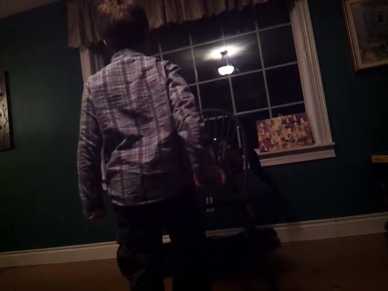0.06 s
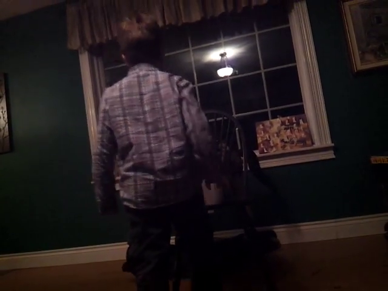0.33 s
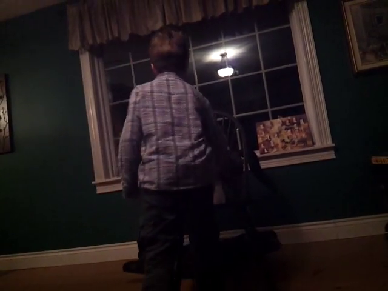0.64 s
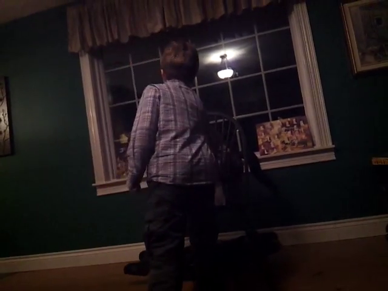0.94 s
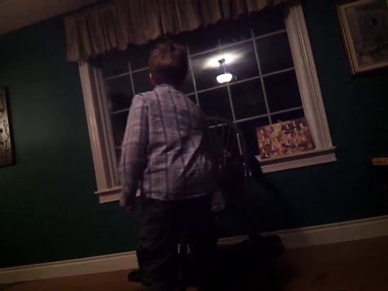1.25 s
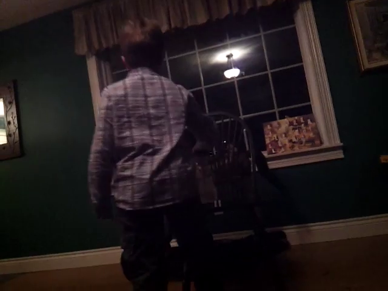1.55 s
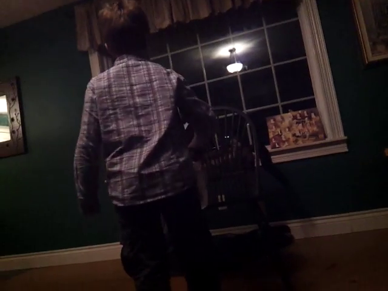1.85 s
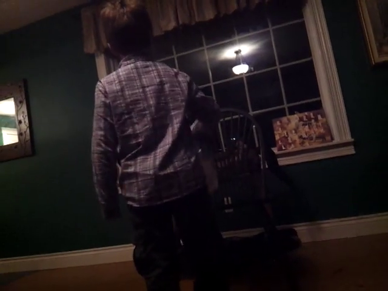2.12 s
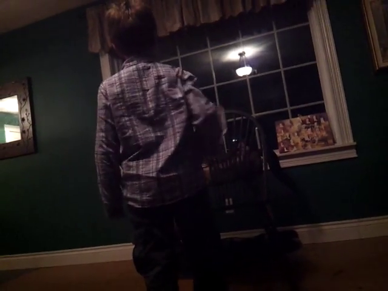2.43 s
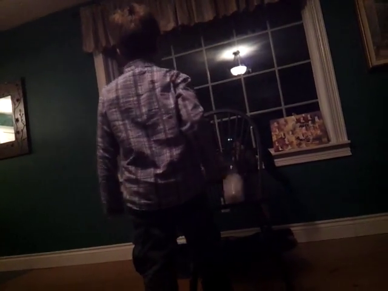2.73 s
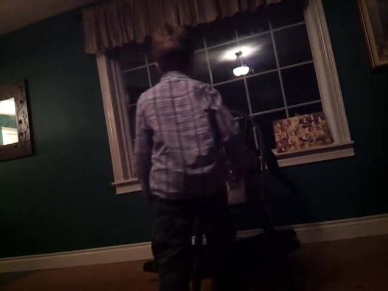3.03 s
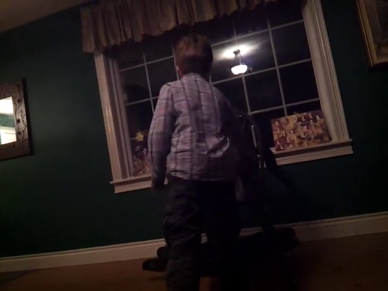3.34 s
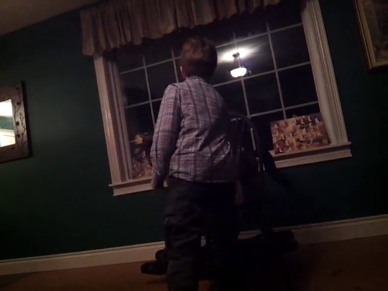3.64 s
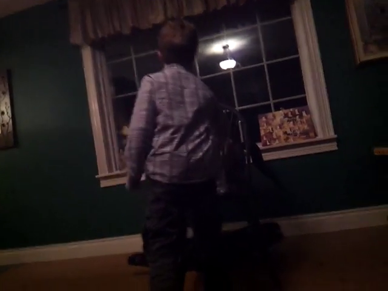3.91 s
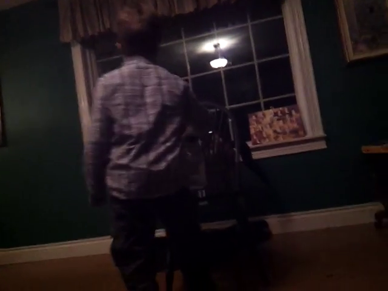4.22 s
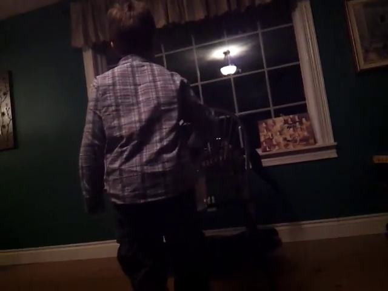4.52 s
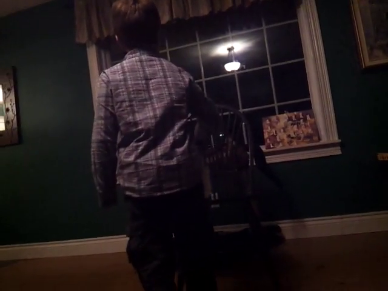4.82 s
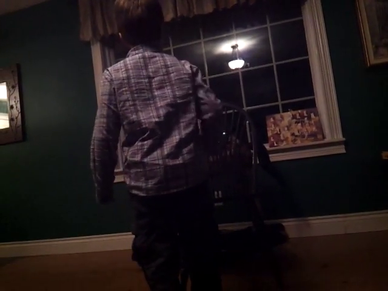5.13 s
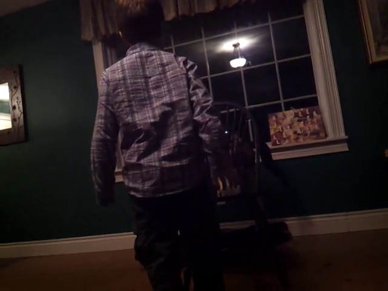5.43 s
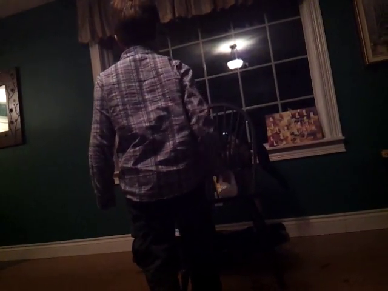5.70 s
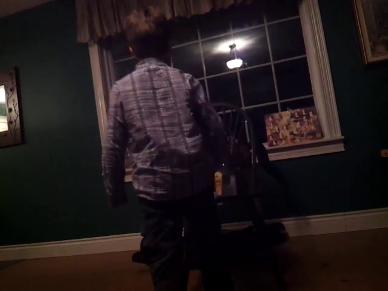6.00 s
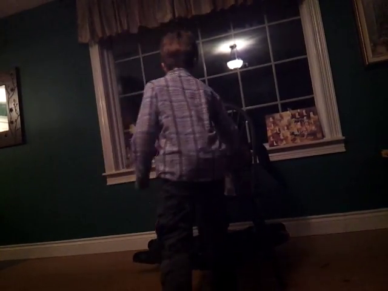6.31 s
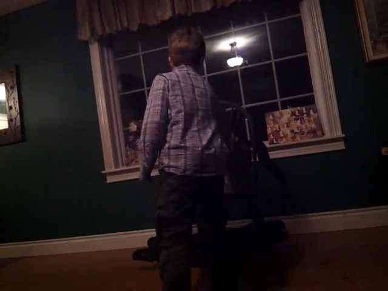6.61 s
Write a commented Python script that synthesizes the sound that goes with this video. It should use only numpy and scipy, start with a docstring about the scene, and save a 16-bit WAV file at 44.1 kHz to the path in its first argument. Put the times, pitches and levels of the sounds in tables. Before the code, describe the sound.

A plastic bottle with water in it is flipped three times, landing with a crack and thud, then knocking on a wooden floor indoors.

```python
"""Bottle flips in a bare room.

A child flips a part-filled plastic bottle three times. Each impact excites a damped response: the
shell cracks against a chair, the water slams after it, and the bottle drops, bounces and rolls on the
wooden floor. Between throws, friction sounds in clothes and soft steps, and water sloshes at its
resonance, over steady hiss, rumble and a faint mains hum."""
import sys
import numpy as np
from scipy import signal
from scipy.fft import rfft, irfft
from scipy.io import wavfile

SR = 44100
rng = np.random.default_rng(int(sys.argv[2]) if len(sys.argv) > 2 else 0)


def put_to_file(sound):
    """Save the sound as 16-bit audio at rate SR, in the file named by the first command-line argument."""
    columns = np.atleast_2d(sound).T  # one column per channel
    safe = np.clip(columns, -1, 1)
    whole_steps = np.round(safe * 32767)
    wavfile.write(sys.argv[1], SR, whole_steps.astype(np.int16))


N = 298101


def gain_of(db):
    """Amplitude ratio of a level in decibels."""
    return 10 ** (np.asarray(db) / 20)


def unit_rms(x):
    """Normalisation to an rms of 1."""
    return x / np.sqrt(np.mean(x ** 2) + 1e-20)


def unit_energy(x):
    """Normalisation to an energy of 1."""
    return x / np.linalg.norm(x)


def value_at(curve, hz):
    """Interpolation on a logarithmic frequency axis."""
    curve_hz, values = np.transpose(curve)
    return np.interp(np.log(hz + 1), np.log(curve_hz + 1), values)


def add(mix, start_s, sound):
    """Superposition of a sound on the mix."""
    part = mix[max(round(start_s * SR), 0):][:len(sound)]
    part += sound[:len(part)]


def coloured(x, spectrum):
    """Spectral shaping by a gain curve, returned at an rms of 1."""
    gains = gain_of(value_at(spectrum, np.fft.rfftfreq(len(x), 1 / SR)))
    return unit_rms(irfft(rfft(x) * gains, len(x)))


def resonate(x, hz, width_hz):
    """Resonance: two like band-pass stages in cascade, each of the given width."""
    carrier = np.exp(2j * np.pi * hz * np.arange(len(x)) / SR)
    pole = np.exp(-np.pi * width_hz / SR)
    for _ in range(2):
        x = 2 * (carrier * signal.lfilter([1 - pole], [1, -pole], x / carrier)).real
    return x


def stroke(start_s, rise_s, peak_db, fade_db_per_s):
    """Envelope of one movement: a smooth rise, then exponential decay."""
    age = np.arange(N) / SR - start_s
    swell = np.sin(np.pi / 2 * np.clip(age / rise_s, 0, 1)) ** 2
    return swell * gain_of(peak_db - fade_db_per_s * np.maximum(age - rise_s, 0))


# Background noise. Each row: frequency in Hz, relative spectral density in dB.
AIR_SPECTRUM = [(18, -26), (30, -34), (58, -1), (113, 0), (160, -9), (302, -2.5), (1300, -13.5),
                (3200, -20.5), (5880, -21), (8990, -28), (17000, -30.5)]
# Mains hum. Each row: frequency in Hz, rms level in dB.
HUM_PARTIALS = [(60, -81), (119.5, -60.5), (179, -67.5)]

def room_tone(air_db=-52):
    """Stationary background: a continuous spectrum of hiss and rumble under the lines of mains hum."""
    t = np.arange(N) / SR
    hum = sum(gain_of(db) * np.sqrt(2) * np.sin(2 * np.pi * (hz * t + rng.random()))
              for hz, db in HUM_PARTIALS)
    return gain_of(air_db) * coloured(rng.standard_normal(N), AIR_SPECTRUM) + hum


# Decay of the room. Each row: frequency in Hz, time to fall 60 dB in seconds.
REVERB_TIMES = [(60, 0.2), (250, 0.6), (700, 0.64), (1500, 0.64), (3000, 0.59), (6000, 0.55), (9000, 0.34),
                (14000, 0.052)]

def room(direct_db, early_db, early_t60, echoes_per_s=5000, build_s=0.0057):
    """Impulse response: direct sound, a cluster of chatter and near reflections, and a diffuse tail."""
    t = np.arange(SR) / SR
    near, far = rng.standard_normal((2, SR))
    echoes = near * (rng.random(SR) < echoes_per_s / SR)
    early = unit_energy(echoes * gain_of(-60 * t / early_t60))
    hz, frame_s, bands = signal.stft(far, SR, nperseg=256)
    decay = gain_of(-60 * frame_s / value_at(REVERB_TIMES, hz)[:, None])
    tail = signal.istft(bands * decay, SR, nperseg=256)[1][:SR]
    response = unit_energy(tail * (1 - np.exp(-t / build_s))) + gain_of(early_db) * early
    response[0] += gain_of(direct_db)
    return response


def friction(strokes, spectrum, fade_db_per_s, slips_per_s, spread_db, wet_db):
    """Stick-slip friction: tiny uneven slips, smeared by the room, swell with each movement."""
    slips = rng.standard_normal(N) * (rng.random(N) < slips_per_s / SR)
    slips *= gain_of(spread_db * np.minimum(rng.exponential(1, N), 4))
    response = unit_energy(room(direct_db=-25, early_db=-3.5, early_t60=0.11))
    smear = signal.fftconvolve(slips, response)[:N]
    effort = np.sqrt(sum(stroke(*row, fade_db_per_s) ** 2 for row in strokes))
    return coloured(slips + gain_of(wet_db) * smear, spectrum) * effort


# Movements of the clothes. Each row: start in seconds, rise in seconds, peak in dB.
RUSTLES = [(-.02, 0.018, -41.5), (.44, 0.042, -52.5), (.73, .03, -52.5), (1.08, 0.26, -52),
           (1.42, 0.19, -52), (1.61, 0.16, -42.5), (1.85, .03, -45.5), (1.98, 0.24, -48),
           (2.33, 0.042, -50.5), (2.48, 0.03, -41.5), (2.52, 0.059, -48), (3.07, 0.02, -52.5),
           (3.5, 0.061, -51), (3.71, 0.038, -50.5), (4.17, 0.032, -52.5), (4.5, 0.36, -55),
           (4.84, 0.13, -47.5), (5.21, 0.013, -46.5), (5.75, 0.092, -49), (5.89, 0.02, -42.5),
           (6.1, 0.044, -52.5), (6.22, 0.24, -47.5), (6.53, 0.056, -46.5)]
# Sliding cloth. Each row: frequency in Hz, relative spectral density in dB.
CLOTH_SPECTRUM = [(700, -9), (1500, -2.5), (3000, -6.5), (4500, -4.5), (6500, -4), (8000, -10),
                  (10000, -18), (13000, -18.5), (16500, -20.5)]

def clothes_rustle():
    """Friction of cloth on cloth radiates bright broadband noise."""
    return friction(RUSTLES, CLOTH_SPECTRUM,
                    fade_db_per_s=60.5, slips_per_s=2200, spread_db=-0.5, wet_db=1)


# Soft swishes of sleeve and feet, and one light splash of water in the bottle at 3.96 s.
# Each row: start in seconds, rise in seconds, peak in dB.
SWISHES_AND_SPLASH = [(-.02, 0.018, -32), (1.1, 0.25, -45.5), (1.52, 0.35, -44.5), (1.98, 0.068, -50.5),
                      (2.3, 0.059, -43), (2.485, .015, -37.5), (2.53, 0.028, -36.5), (3.96, 0.04, -50.5),
                      (4.55, 0.04, -51.5), (4.83, 0.14, -33), (5.21, 0.056, -39), (5.73, 0.075, -41)]
# Their shared colour. Each row: frequency in Hz, relative spectral density in dB.
SWISH_SPECTRUM = [(120, -24), (200, -2), (227, -12), (284, -3), (493, -7), (856, -2), (1060, -4.5),
                  (1750, -6.5), (4000, -23.5), (5200, -19), (8800, -120)]

def swishes_and_splash():
    """Dense random pulses merge into soft noise: sleeve and feet brush, and water splashes once."""
    return friction(SWISHES_AND_SPLASH, SWISH_SPECTRUM,
                    fade_db_per_s=79, slips_per_s=1800, spread_db=2, wet_db=10.5)


def contact_pulse(spectrum, tilt_db, spot_hz, cutoff_hz, spot_db, spot_q, size=8192):
    """Minimum-phase pulse: the struck spot adds a resonance, and a softer contact cuts the treble."""
    hz = np.maximum(abs(np.fft.fftfreq(size, 1 / SR)), 1)
    db = value_at(spectrum, hz) + tilt_db * np.log2(np.maximum(hz, 100) / 1000)
    db += spot_db / (1 + (spot_q * (hz / spot_hz - spot_hz / hz)) ** 2)
    db -= 10 * np.log10(1 + (hz / cutoff_hz) ** 4)
    log_gain = np.log(gain_of(np.maximum(db, db.max() - 90)))
    causal_spectrum = np.exp(signal.hilbert(log_gain).conj())
    return unit_energy(np.fft.ifft(causal_spectrum).real[:size // 2])


def ring(modes):
    """Free vibration: exponentially damped modes with random phases."""
    t = np.arange(SR) / SR
    phases = 2 * np.pi * rng.random(len(modes))
    return sum(gain_of(db - 60 * t / t60) * np.sin(2 * np.pi * hz * t + phase)
               for phase, (hz, db, t60) in zip(phases, modes))


def impacts(rows, spectrum, spot_db, spot_q, contact_hz, stiffening, hardening_db,
            direct_db, early_db, early_t60, modes=None, ring_db=0):
    """Impact excitation: each pulse drives the room and any modes of the struck body."""
    out = np.zeros(N)
    _, mean_db, _, mean_hz = np.mean(rows, axis=0)
    for start_s, db, tilt_db, spot_hz in rows:
        excess_db = db - mean_db
        # A stiffer spot or a harder blow shortens the contact, which brightens it.
        cutoff_hz = contact_hz * (spot_hz / mean_hz) ** stiffening * 2 ** (excess_db / hardening_db)
        pulse = contact_pulse(spectrum, tilt_db, spot_hz, cutoff_hz, spot_db, spot_q)
        # A hard blow is one clean contact; a light one mostly chatters.
        response = room(direct_db + 0.64 * excess_db, early_db, early_t60)
        sound = unit_energy(signal.fftconvolve(response, pulse)[:SR])
        if modes:
            ringing = unit_energy(signal.fftconvolve(ring(modes), pulse)[:SR])
            sound = unit_energy(sound + gain_of(ring_db) * ringing)
        add(out, start_s, gain_of(db) * np.sqrt(0.05 * SR) * sound)  # level: energy spread over 50 ms
    return out


# Shell strikes. Each row: start in seconds, level in dB, tilt in dB per octave, spot resonance in Hz.
CRACKS = [(.1058, -21.5, -4, 3040), (.189, -28, 1.5, 5100), (2.719, -27, -5, 2950),
          (2.7368, -25.5, 7, 2980), (2.7475, -33, -1, 1940), (5.3278, -14, -2.5, 5430),
          (5.463, -38, 10, 2070), (5.5373, -31, 0, 4800)]
# The plastic shell. Each row: frequency in Hz, relative spectral density in dB.
SHELL_SPECTRUM = [(150, -23), (400, -23), (900, -4), (1400, -9.5), (2000, 3.5), (2500, 0), (3100, 3.5),
                  (3800, 0), (5000, 0.5), (6600, -0.5), (7800, -5.5), (9500, -12.5), (11000, -14.5),
                  (13500, -15), (16000, -46)]

def shell_cracks():
    """A brief contact has a wide spectrum, so the plastic shell strikes with a bright crack."""
    return impacts(CRACKS, SHELL_SPECTRUM, spot_db=4, spot_q=3.3,
                   contact_hz=7400, stiffening=0.05, hardening_db=68,
                   direct_db=-21, early_db=6, early_t60=0.12)


# Heavy landings. Each row: start in seconds, level in dB, tilt in dB per octave, spot resonance in Hz.
THUDS = [(.108, -24, 4, 236), (.151, -22, 6.5, 139), (.1905, -25.5, -8, 384), (.2305, -18, -3, 139),
         (.556, -34, 0, 114), (.616, -35.5, 6.5, 64.3), (.97, -46.5, -1, 86), (1.32, -42, -4, 81),
         (2.729, -18.5, -2, 149), (2.7405, -20.5, -6.5, 116), (2.747, -17, 4, 337),
         (3.125, -31.5, 0.5, 302), (3.268, -34, 1.5, 55), (5.33, -20, 8.5, 228), (5.368, -12, 6.5, 208),
         (5.386, -19, 6.5, 106), (5.472, -19, 1, 114), (6.008, -32, -1, 266), (6.08, -35, 1, 76),
         (6.243, -34, 9, 302), (6.292, -33, -19, 79), (6.34, -30, 10.5, 292), (6.366, -27, -15, 58.3)]
# A soft, heavy blow. Each row: frequency in Hz, relative spectral density in dB.
THUD_SPECTRUM = [(30, -12), (55, 1.5), (110, 1.5), (220, 2), (380, -5.5), (600, -14.5), (1200, -16.5),
                 (3000, -38), (8000, -80)]
# Floor and room modes. Each row: frequency in Hz, relative level in dB, time to fall 60 dB in seconds.
BOOM_MODES = [(58, -3, 1), (80.4, 0, 0.75), (115.1, 0.5, 0.37), (147.5, -7.5, 0.57), (197, -0.5, 0.28),
              (234.3, -5.5, 0.22), (306, -2.5, 0.51)]

def water_and_heel_thuds():
    """A long contact drives low modes: the water's weight, or a heel, makes floor and room boom."""
    return impacts(THUDS, THUD_SPECTRUM, spot_db=9, spot_q=2.44,
                   contact_hz=400, stiffening=0.83, hardening_db=42,
                   direct_db=-6.5, early_db=2.5, early_t60=0.16, modes=BOOM_MODES, ring_db=1)


# Blows on wood. Each row: start in seconds, level in dB, tilt in dB per octave, spot resonance in Hz.
KNOCKS = [(.1893, -13.5, -1.5, 680), (.1937, -12.5, -1, 1250), (.206, -15.5, 2, 704), (.231, -25, 0, 690),
          (.284, -21.5, 0.5, 645), (.49, -34.5, -1, 424), (.5562, -32.5, 0.5, 656),
          (2.737, -12.5, 6.5, 700), (2.7462, -19, 0, 1900), (2.86, -28.5, 0.5, 348), (3.12, -36, -1.5, 980),
          (3.1285, -28, -1, 650), (3.205, -31.5, -6, 574), (3.272, -49, -4, 705), (5.368, -20.5, -0.5, 415),
          (5.4625, -15, -1, 1650), (5.472, -22.5, -2, 905), (5.486, -23.5, -1, 666),
          (5.997, -39, -2.5, 1130), (6.005, -33, 0, 1065), (6.755, -39.5, 4.5, 990)]
# Struck wood. Each row: frequency in Hz, relative spectral density in dB.
WOOD_SPECTRUM = [(80, -8.5), (160, -3), (350, -0.5), (480, -5), (700, 1), (900, -4.5), (1250, -4),
                 (1550, -9.5), (1950, -6.5), (2500, -13.5), (3500, -16), (6000, -20), (9000, -78),
                 (14000, -75)]
# Board modes. Each row: frequency in Hz, relative level in dB, time to fall 60 dB in seconds.
BOARD_MODES = [(367, -2.5, 0.86), (495, -0.5, 0.84), (553, -10, 0.63), (616, 4.5, 0.58), (755, -4.5, 0.23),
               (850, 3, 0.58), (1188, 8.5, 0.27), (1310, -27, 0.53), (1725, 6.5, 0.23), (2060, -38, 0.4)]

def wood_knocks():
    """Modal ringing: the bottle knocks on wood and the boards vibrate at their natural frequencies."""
    return impacts(KNOCKS, WOOD_SPECTRUM, spot_db=8.5, spot_q=6.8,
                   contact_hz=1590, stiffening=0.49, hardening_db=31,
                   direct_db=-8.5, early_db=5, early_t60=0.17, modes=BOARD_MODES, ring_db=-10)


# Footfalls. Each row: start in seconds, rise in seconds, peak in dB.
STEPS = [(1.13, 0.2, -39), (2.52, 0.028, -31.5), (4.88, 0.11, -35)]
# The loaded floor. Each row: frequency in Hz, relative spectral density in dB.
TREAD_SPECTRUM = [(18, -31), (30, -5), (81, 6), (146, -4.5), (292, -1.5), (727, -9), (781, -13), (900, -7),
                  (1170, -27), (1980, -120)]

def soft_steps():
    """Friction under gradual loading: feet press on the boards with a low noise."""
    return friction(STEPS, TREAD_SPECTRUM, fade_db_per_s=73, slips_per_s=370, spread_db=-3.5, wet_db=7.5)


# Surges of water. Each row: start in seconds, rise in seconds, peak in dB, resonance in Hz.
SLOSHES = [(2.299, 0.03, -42, 315), (2.378, 0.016, -42.5, 298), (3.864, 0.027, -44, 436),
           (3.971, 0.032, -51.5, 447), (4.421, 0.022, -48.5, 474), (4.6, 0.09, -43, 278),
           (4.75, 0.014, -44, 270)]

def water_slosh(upper_db=-6, fade_db_per_s=75):
    """Noise-driven resonance: a surge stirs a low band set by the bottle's tilt and a weaker one above."""
    out = np.zeros(N)
    for start_s, rise_s, peak_db, hz in SLOSHES:
        stir = rng.standard_normal(SR)
        gurgle = unit_rms(resonate(stir, hz, width_hz=135))
        splash = unit_rms(resonate(stir, 2.2 * hz, width_hz=290))
        surge = stroke(0, rise_s, peak_db, fade_db_per_s)[:SR]
        add(out, start_s, (gurgle + gain_of(upper_db) * splash) * surge)
    return out


# Hollow resonances of bottle and boards. Each row: frequency in Hz, stage width in Hz, gain in dB.
ROLL_RESONANCES = [(201, 81, 1.5), (295, 56, 4.5), (414, 570, -4), (596, 89, 1), (848, 110, -5),
                   (1100, 250, -17.5)]

def bottle_roll(bumps_per_s=600):
    """Forced vibration: the ribs patter on the boards, swelling, then fading as the bottle coasts."""
    bumps = rng.standard_normal(N) * (rng.random(N) < bumps_per_s / SR)
    patter = signal.fftconvolve(bumps, room(direct_db=-6, early_db=1, early_t60=0.23))[:N]
    body = sum(gain_of(db) * resonate(patter, hz, width_hz) for hz, width_hz, db in ROLL_RESONANCES)
    return unit_rms(body) * stroke(start_s=6.1, rise_s=0.28, peak_db=-30.5, fade_db_per_s=74)


def scene():
    """Linear superposition of all sources at one microphone."""
    landings = shell_cracks() + wood_knocks() + water_and_heel_thuds()
    movements = clothes_rustle() + swishes_and_splash() + soft_steps()
    return (landings + movements + water_slosh() + bottle_roll() + room_tone())[None]


def record(dry, low_hz=42, high_hz=17000):
    """Band limiting and soft saturation: deep bass is shed, peaks round off, the top treble is cut."""
    highpass = signal.butter(4, low_hz, "highpass", fs=SR, output="sos")
    lowpass = signal.firwin(511, high_hz, window=("kaiser", 9), fs=SR)
    thinned = signal.sosfilt(highpass, dry)
    rounded = thinned / (1 + thinned ** 6) ** (1 / 6)
    return signal.oaconvolve(rounded, lowpass[None], "same")


dry = scene()
out = record(dry)
put_to_file(out)
```